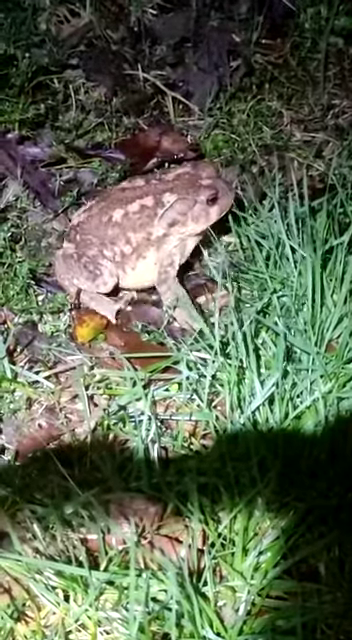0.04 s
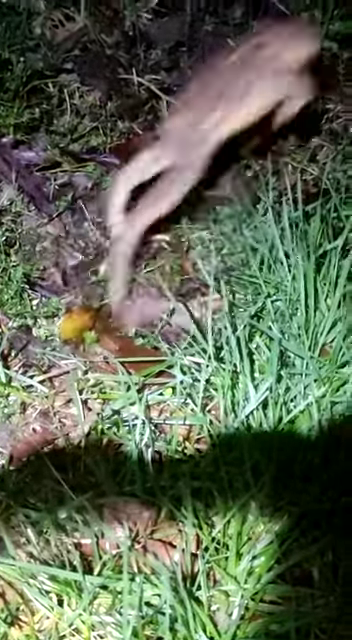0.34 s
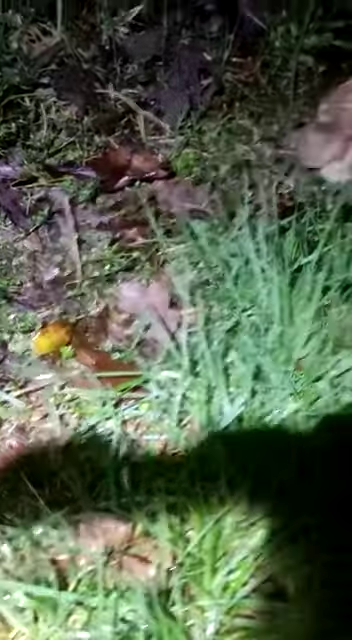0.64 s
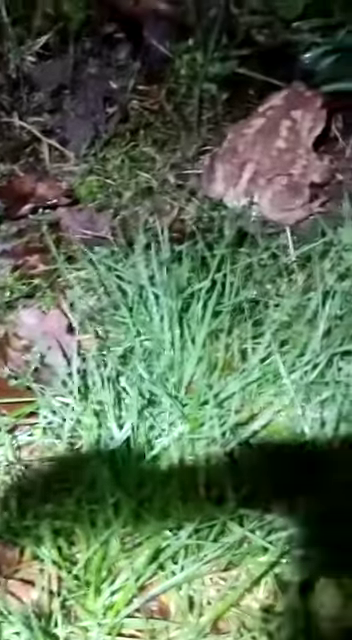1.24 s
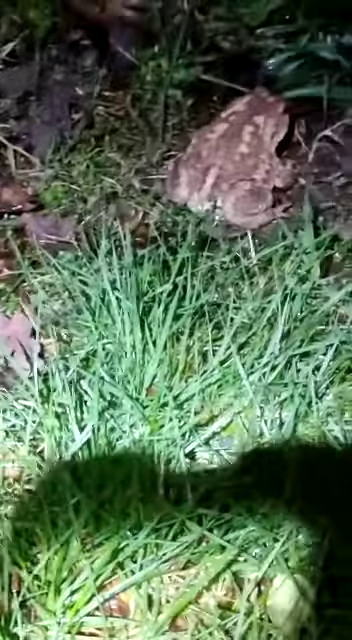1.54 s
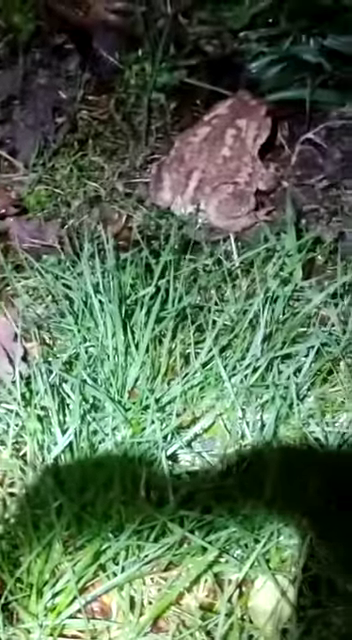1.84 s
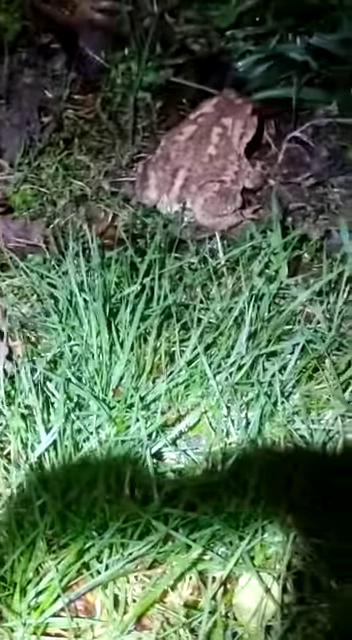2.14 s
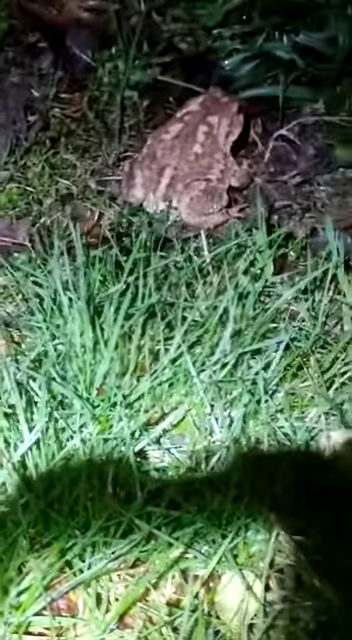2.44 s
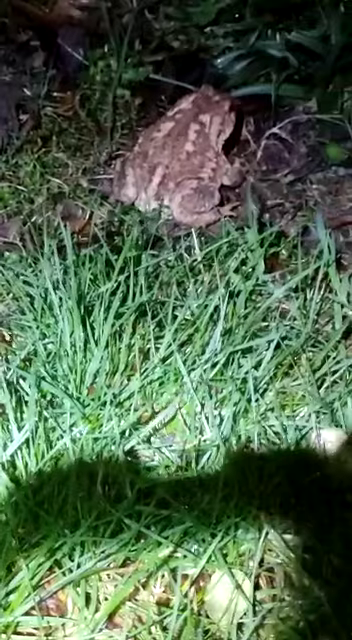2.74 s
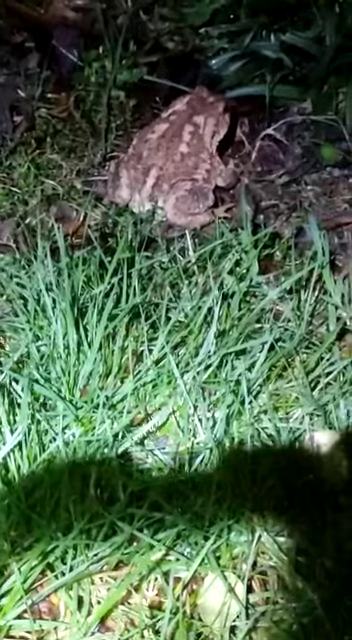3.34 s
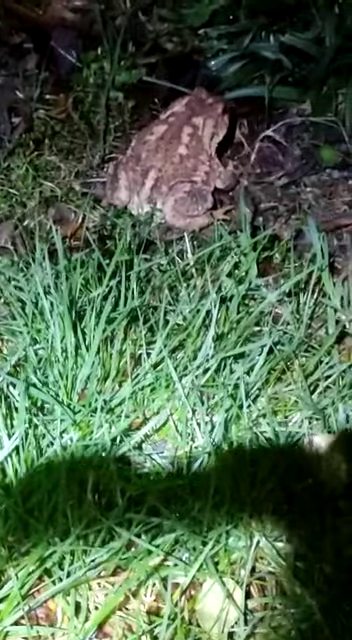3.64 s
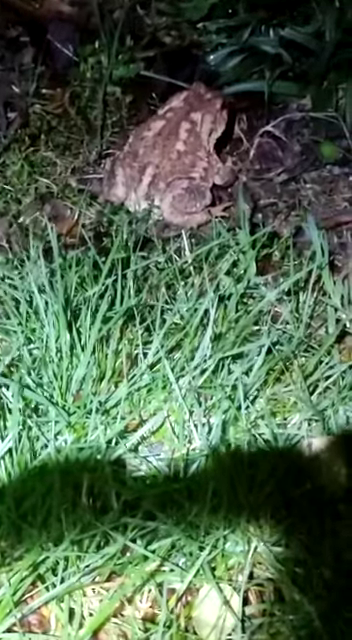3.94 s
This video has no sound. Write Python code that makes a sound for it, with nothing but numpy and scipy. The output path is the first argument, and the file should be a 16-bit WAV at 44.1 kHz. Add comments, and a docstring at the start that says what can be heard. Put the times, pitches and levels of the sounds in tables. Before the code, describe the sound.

A light breeze buffets the microphone with an uneven low rumble and dull thumps in a garden at night. Near the start, a toad's leap makes one faint dry tick and a brief rustle. A thin hiss lies behind.

```python
"""A light breeze tumbles over two microphone ports (its openings) in a garden at night.
Swirls of air, called eddies, give each port its own lumpy rumble and flurries of dull thumps.
A toad leaps from dead leaves and brushes through the grass: one dry tick and one short rustle.
Behind it lie a faint rising tone, one small peep, a far murmur of open air and a steady thin hiss."""
import sys
import numpy as np
from scipy import signal
from scipy.fft import rfft, irfft
from scipy.io import wavfile
from scipy.ndimage import uniform_filter1d

SR = 44100
rng = np.random.default_rng(int(sys.argv[2]) if len(sys.argv) > 2 else 0)


def wrap_up_sound(samples):
    """Save the sound to the file named by the first command line argument, as 16-bit audio."""
    columns = np.atleast_2d(samples).T
    # keep every value between -1 and 1, then stretch to whole-number steps
    tamed = np.clip(columns, -1, 1)
    steps = np.round(tamed * 32767).astype(np.int16)
    wavfile.write(sys.argv[1], SR, steps)


N = 176400

# How hard the breeze blows at each port. Each row: time in seconds, strength in dB.
LEFT_STRENGTH = [(0.0, -53), (0.02, -45), (0.07, -29.5), (0.19, -32.5), (0.27, -28), (0.34, -30),
                 (0.37, -34.5), (0.49, -40.5), (0.53, -45), (0.56, -37), (0.76, -37.5), (0.82, -52),
                 (0.89, -48.5), (0.95, -38), (0.98, -57), (1.02, -42.5), (1.29, -40.5), (1.37, -35),
                 (1.46, -46.5), (1.49, -33), (1.54, -45.5), (1.66, -30), (1.76, -40.5), (1.83, -32.5),
                 (1.86, -39.5), (2.09, -38), (2.26, -56), (2.39, -47), (2.42, -38.5), (2.47, -34.5),
                 (2.57, -47), (2.59, -38.5), (2.76, -39), (2.79, -57), (2.82, -40), (2.98, -35),
                 (3.07, -50), (3.18, -52), (3.2, -28), (3.22, -42), (3.51, -40.5), (3.54, -67), (3.56, -36),
                 (3.59, -28.5), (3.63, -47), (3.69, -38), (3.8, -51.5), (3.89, -59), (3.99, -42.5)]
RIGHT_STRENGTH = [(0.0, -26.5), (0.02, -22.5), (0.07, -26), (0.12, -32.5), (0.16, -43), (0.21, -29.5),
                  (0.34, -38.5), (0.38, -52), (0.41, -39.5), (0.47, -31.5), (0.5, -52), (0.54, -47),
                  (0.57, -28), (0.67, -36.5), (0.75, -40), (0.91, -58.5), (1.06, -31.5), (1.22, -46),
                  (1.33, -39), (1.41, -42.5), (1.49, -35), (1.51, -45.5), (1.65, -49), (1.825, -60),
                  (1.85, -34.5), (1.96, -32.5), (1.99, -28.5), (2.04, -28.5), (2.06, -46), (2.16, -31),
                  (2.25, -45.5), (2.32, -34.5), (2.39, -44), (2.42, -41), (2.48, -60), (2.52, -33.5),
                  (2.59, -35.5), (2.61, -58), (2.65, -31.5), (2.68, -77), (2.71, -40.5), (2.88, -45.5),
                  (2.9, -38.5), (2.95, -43), (3.06, -26.5), (3.1, -41.5), (3.17, -32), (3.19, -49),
                  (3.23, -38.5), (3.29, -23), (3.33, -32), (3.38, -52.5), (3.42, -39.5), (3.46, -68),
                  (3.55, -31.5), (3.6, -56), (3.64, -39), (3.69, -76.5), (3.77, -37.5), (3.93, -53.5),
                  (3.99, -37.5)]
# Single strong eddies that hit a port. Each row: time in seconds, peak in dB before the bass is
# thinned, half width in milliseconds, port (0 is left, 1 is right).
STRONG_EDDIES = [(0.027, -12.5, 1.85, 1), (0.051, -16.5, 0.94, 1), (0.077, -14, 1.18, 1),
                 (0.132, -12.5, 1.85, 1), (0.271, -21.5, 1.03, 0), (0.291, -21, 0.99, 0),
                 (0.320, -24.5, 1.1, 0), (0.348, -24.5, 1.26, 0), (0.402, -18.5, 1.7, 1),
                 (0.43, -19.5, 1.08, 1), (0.466, -23, 1.34, 1), (0.548, -25, 1.37, 1),
                 (0.583, -17, 1.54, 1), (0.606, -22.5, 1.06, 1), (0.657, -19.5, 1.6, 1),
                 (0.676, -21.5, 1.7, 1), (0.941, -21, 1.43, 0), (1.484, -16, 1.5, 1),
                 (1.716, -23.5, 1.05, 0), (1.835, -20, 1.35, 0), (1.842, -15, 1.7, 1),
                 (1.842, -11, 0.71, 1), (1.862, -23, 0.85, 1), (1.873, -15, 1.5, 1),
                 (1.915, -21.5, 0.91, 1), (1.947, -15, 1.23, 1), (1.994, -27.5, 0.78, 1),
                 (2.032, -16.5, 1.43, 1), (2.150, -20, 2, 1), (2.161, -22, 1.18, 1), (2.911, -22, 1.44, 1),
                 (2.926, -29, 0.91, 1), (2.994, -23, 1.37, 1), (3.035, -22, 0.81, 1), (3.052, -14, 1.24, 1),
                 (3.073, -16, 1.56, 1), (3.159, -15, 0.84, 1), (3.205, -23, 1.2, 0), (3.22, -17, 1.06, 1),
                 (3.243, -19.5, 1.35, 1), (3.286, -23.5, 2.5, 1), (3.3, -12.5, 1, 1), (3.314, -16, 0.99, 1),
                 (3.371, -24, 1.5, 0), (3.455, -26, 1.33, 0), (3.591, -24, 0.93, 0)]
# The toad's feet touch leaves and grass.
# Each row: time of the peak in seconds, level in dB, rise time in seconds, fade time in seconds.
FOOT_TOUCHES = [(0.185, -69, .02, 0.015), (0.440, -50, 0.003, 0.0014), (0.455, -57, 0.005, 0.0042),
                (0.459, -49.5, 0.0051, 0.0038), (0.474, -52, 0.003, 0.002), (0.480, -52, 0.002, 0.0042)]
# The colour of the crisp tick and rustle as each port hears it; the left port rings near 8.3 kHz.
# Each row: frequency in Hz, left and right relative levels in dB.
CRISP_COLOUR = [(1500, -6, -6), (3500, -12.5, -10), (4600, -10, -8), (6400, -2.5, -3), (7350, -5.5, -8),
                (8300, 7, -2), (10000, -2, 3), (11100, -11, -6), (11900, -8, -5), (15500, -15, -10)]
# The path of the rising tone. Each row: time in seconds, pitch in Hz, level in dB.
TONE_PATH = [(0.76, 400, -87), (0.82, 415.6, -86), (0.87, 445.5, -59), (0.911, 463, -58), (0.97, 474, -67),
             (1.02, 493, -90)]
# The tone colour of far open air. Each row: frequency in Hz, relative level in dB.
MURMUR_COLOUR = [(30, -28), (100, -6), (250, 3.5), (450, -1), (570, -4.5), (780, -7), (1000, -11),
                 (1700, -13.5), (2100, -44), (5000, -44)]
# The tone colour of the hiss. Each row: frequency in Hz, left and right relative levels in dB.
HISS_COLOUR = [(500, 1, -2.5), (1950, 1, -1.5), (4130, -1, -3.5), (6980, -2, -6.5), (6680, -9.5, -11),
               (8600, 3.5, -12.5), (9590, -6.5, -7), (11520, -15, -20.5), (11800, -7, -8.5),
               (16200, -23, -23.5)]
# How the treble of the hiss drifts. Each row: time in seconds, boost in dB.
HISS_TREBLE = [(0, -2), (0.3, 1.5), (0.7, 0.5), (3.6, 1), (3.85, 4), (4, 5)]

EDDY_HZ, EDDY_SLOPE = 131.5, 1.934   # the rumble falls off above the typical eddy rate
FINEST_HZ, FINEST_SLOPE = 308, 3.1   # and steeply above the finest eddies
REFERENCE_DB, OCTAVES_PER_DB = -29, .042   # a breeze stronger than this makes both rates faster
LOW_CUT_HZ, LOW_CUT_SLOPE = 92.4, 3.6   # the microphone thins the bass of the breeze


def breeze_rumble(strength, eddy_speed):
    """Swirling air at one port: it grows louder and brighter as the breeze speeds up."""
    strength_db = np.interp(seconds(), *np.transpose(strength))
    speed = eddy_speed * 2 ** (OCTAVES_PER_DB * (strength_db - REFERENCE_DB))
    noise_spectrum = rfft(rng.standard_normal(N))
    rumble = 0
    for hz in 16 * 2 ** (np.arange(20) / 3):   # three bands to an octave
        band_shape = np.maximum(1 - 3 * np.abs(np.log2(bin_hz() / hz)), 0)
        band = irfft(noise_spectrum * band_shape, N)
        gain = roll_off(hz / (EDDY_HZ * speed), EDDY_SLOPE)
        gain *= roll_off(hz / (FINEST_HZ * speed), FINEST_SLOPE)
        rumble += band * gain * roll_off(LOW_CUT_HZ / hz, LOW_CUT_SLOPE)
    # Even out chance swells, so that the loudness follows the breeze's strength.
    span = int(0.059 * SR)
    power = uniform_filter1d(uniform_filter1d(rumble ** 2, span), span // 2)
    even_rumble = rms_one(rumble / np.sqrt(power + 1e-20))
    return from_db(strength_db + 0.5) * even_rumble


def breeze_thumps():
    """Each strong eddy is one smooth push and pull of pressure, with its deep bass thinned."""
    pressure = np.zeros((2, N))
    for time_s, db, half_width_ms, port in STRONG_EDDIES:
        offset = (seconds() - time_s) / (half_width_ms / 1000)
        pressure[int(port)] -= from_db(db) * offset * np.exp((1 - offset ** 2) / 2)
    return irfft(rfft(pressure) * roll_off(LOW_CUT_HZ / bin_hz(), LOW_CUT_SLOPE), N)


def toad_snap(start_s=.2971, peak_db=-37.5, tearing_db=-14, fade_s=.0014):
    """One dry crack as the toad pushes off, then a brief tearing of fibres."""
    age = seconds() - start_s
    fade = (age >= 0) * np.exp(-np.abs(age) / fade_s)
    burst = from_db(tearing_db) * fade * rng.standard_normal((2, N))
    burst[:, int(start_s * SR)] = 1   # the crack itself
    tick = heard_at_ports(burst)
    return from_db(peak_db) * tick / np.abs(tick).max()


def toad_rustle(crackles_per_s=13000, spread_db=2):
    """Every touch of a foot swells and dies as a shower of tiny crackles in the dry leaves."""
    t = seconds()
    pressure = sum(from_db(db) * np.exp(-np.maximum((peak_s - t) / rise_s, (t - peak_s) / fade_s))
                   for peak_s, db, rise_s, fade_s in FOOT_TOUCHES)
    sizes = from_db(spread_db * rng.standard_normal((2, N)))
    signs = rng.choice([-1, 1], (2, N))
    crackling = rng.random((2, N)) < crackles_per_s / SR
    return pressure * heard_at_ports(sizes * signs * crackling)


def heard_at_ports(sound, right_db=-5.5):
    """Colour the tick or rustle as each port hears it: the left port rings, the right is quieter."""
    colour = np.array(CRISP_COLOUR)
    left = coloured(sound[0], colour[:, [0, 1]])
    right = coloured(sound[1], colour[:, [0, 2]])
    return np.array([left, from_db(right_db) * right])


def far_tone():
    """A soft tone slides upward in the distance."""
    times, hz, db = np.transpose(TONE_PATH)
    phase = 2 * np.pi * np.cumsum(np.interp(seconds(), times, hz)) / SR
    loudness = np.interp(seconds(), times, from_db(db), left=0, right=0)
    return from_the_left(loudness * np.sin(phase))


def far_peep(time_s=1.197, width_s=0.013, pitch_hz=2070, blur_hz=85, level_db=-64.5):
    """One faint, blurred peep far away: a narrow band of noise swells and fades."""
    band_shape = roll_off(np.abs(bin_hz() - pitch_hz) / blur_hz, 1.6)
    tone = irfft(rfft(rng.standard_normal((2, N))) * band_shape, N)
    swell = np.exp(-((seconds() - time_s) / width_s) ** 2 / 2)
    return from_db(level_db) * rms_one(tone) * swell


def far_murmur(level_db=-58, shared_part=.45):
    """Open air murmurs dully in the distance, partly alike at both ports."""
    shared = np.sqrt(shared_part) * from_the_left(rng.standard_normal(N))
    separate = np.sqrt(1 - shared_part) * rng.standard_normal((2, N))
    return from_db(level_db) * coloured(shared + separate, MURMUR_COLOUR)


def thin_hiss(left_db=-64.5, right_db=-65.5, treble_hz=9500):
    """A steady hiss whose treble drifts a little and lifts at the end."""
    colour = np.array(HISS_COLOUR)
    hiss = np.array([from_db(left_db) * coloured(rng.standard_normal(N), colour[:, [0, 1]]),
                     from_db(right_db) * coloured(rng.standard_normal(N), colour[:, [0, 2]])])
    treble = irfft(rfft(hiss) * roll_off(treble_hz / bin_hz(), 2.3), N)
    boost = from_db(np.interp(seconds(), *np.transpose(HISS_TREBLE)))
    return hiss + treble * (boost - 1)


def from_the_left(sound, delay_s=0.00026):
    """A far sound reaches the left port first and the right one a little later."""
    return np.array([sound, np.interp(seconds() - delay_s, seconds(), sound)])


def from_db(db):
    """Turn decibels into a number to multiply by."""
    return 10 ** (np.asarray(db) / 20)


def rms_one(sound):
    """Scale a sound so that its average power is 1."""
    return sound / np.sqrt(np.mean(sound ** 2) + 1e-20)


def seconds():
    """The time of every sample."""
    return np.arange(N) / SR


def bin_hz():
    """The frequency of every point in a spectrum, at least 1 Hz."""
    return np.maximum(np.arange(N // 2 + 1) * SR / N, 1)


def coloured(sound, colour):
    """Shape a sound by rows of frequency in Hz and level in dB, then set its power to 1."""
    hz, db = np.transpose(colour)
    gain = from_db(np.interp(np.log(bin_hz()), np.log(hz), db))
    return rms_one(irfft(rfft(sound) * gain, N))


def roll_off(ratio, slope):
    """A gain near 1 for small ratios that falls past ratio 1; a bigger slope falls faster."""
    return 1 / np.sqrt(1 + ratio ** (2 * slope))


def scene():
    """Add up the breeze, the night behind it and the toad's leap."""
    rumble = np.array([breeze_rumble(LEFT_STRENGTH, eddy_speed=1.012),
                       breeze_rumble(RIGHT_STRENGTH, eddy_speed=0.92)])
    night = far_murmur() + thin_hiss() + far_tone() + far_peep()
    return rumble + breeze_thumps() + toad_snap() + toad_rustle() + night


def record(dry):
    """The deepest bass is thinned, and the highest treble is cut steeply."""
    bass_cut = signal.butter(2, 43.2, "high", fs=SR, output="sos")
    treble_cut = signal.ellip(10, .1, 80, 15700, fs=SR, output="sos")
    return signal.sosfilt(treble_cut, signal.sosfilt(bass_cut, dry))


dry = scene()
out = record(dry)
wrap_up_sound(out)
```